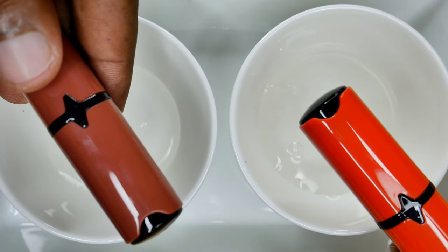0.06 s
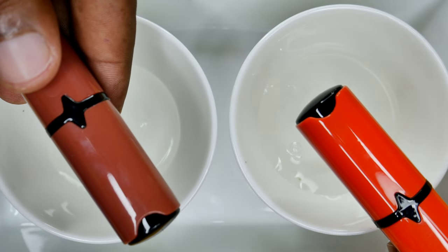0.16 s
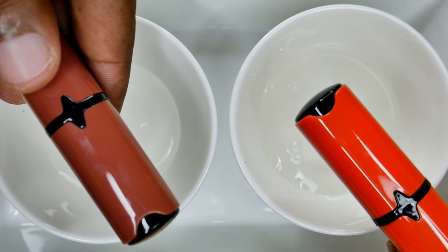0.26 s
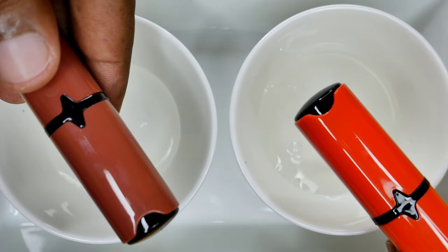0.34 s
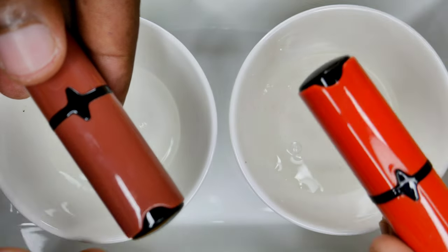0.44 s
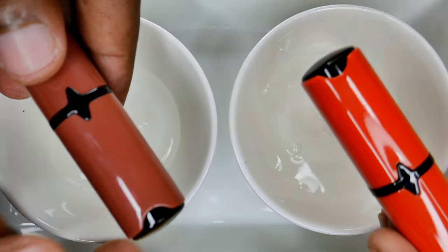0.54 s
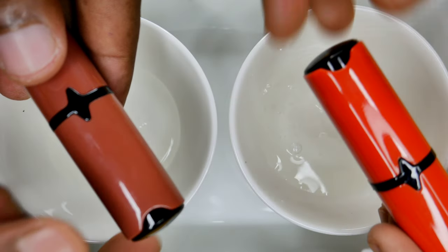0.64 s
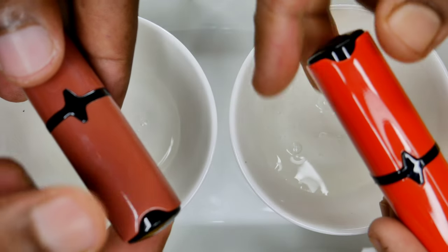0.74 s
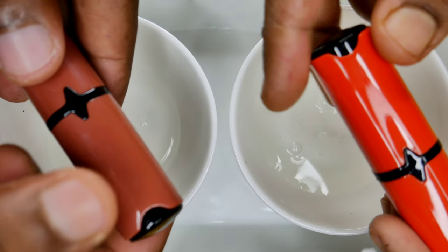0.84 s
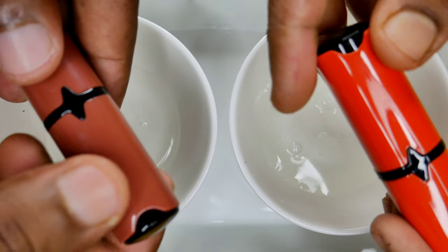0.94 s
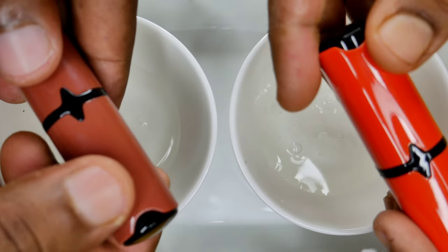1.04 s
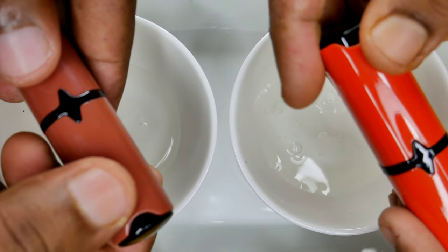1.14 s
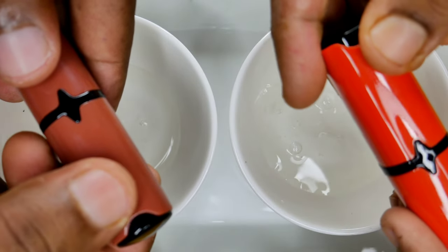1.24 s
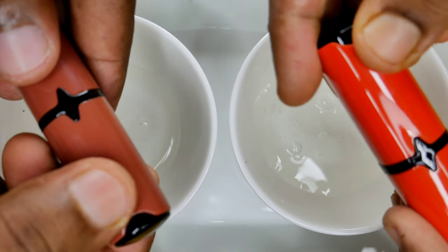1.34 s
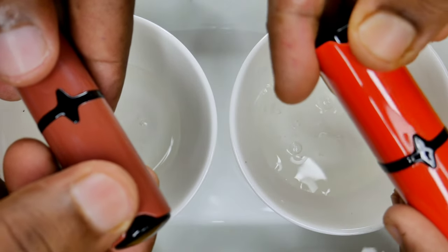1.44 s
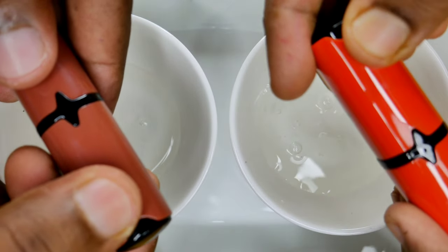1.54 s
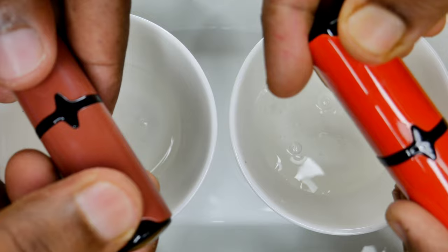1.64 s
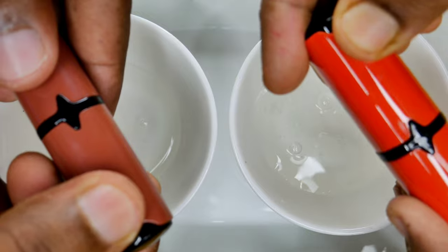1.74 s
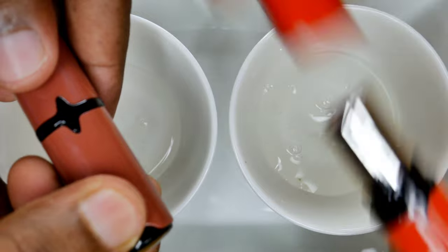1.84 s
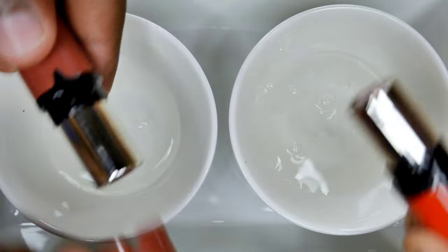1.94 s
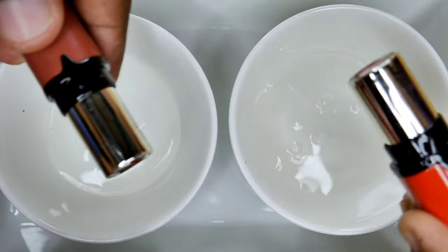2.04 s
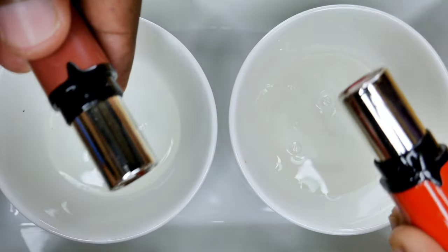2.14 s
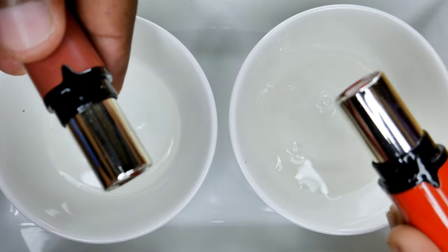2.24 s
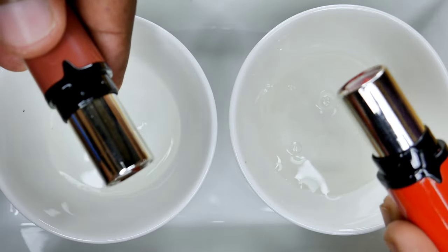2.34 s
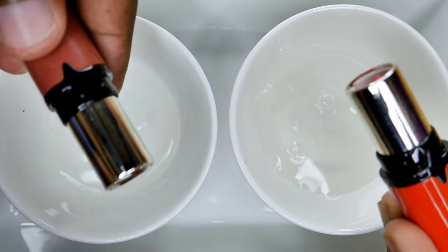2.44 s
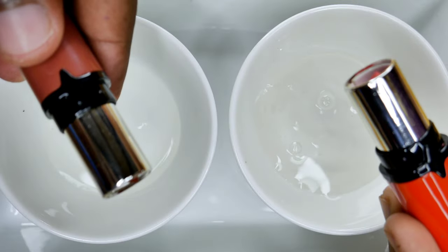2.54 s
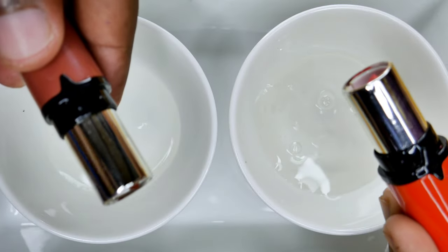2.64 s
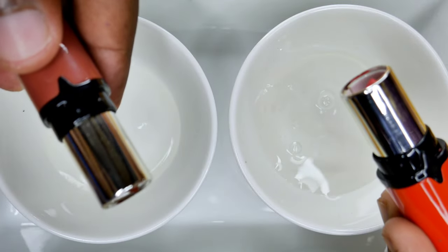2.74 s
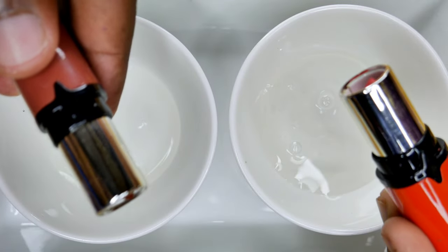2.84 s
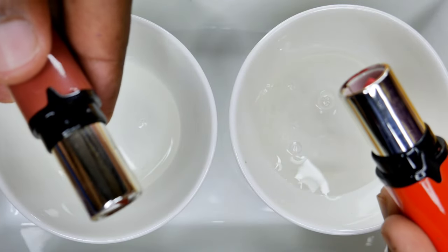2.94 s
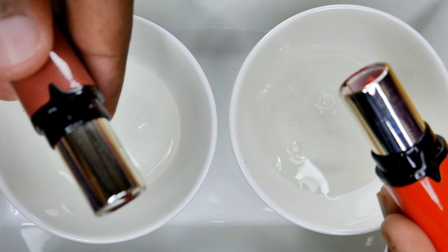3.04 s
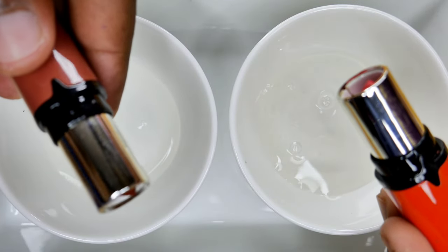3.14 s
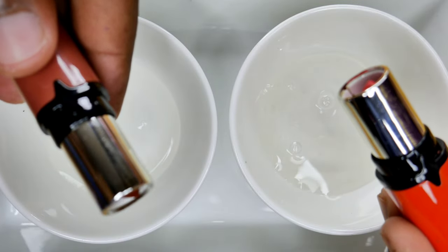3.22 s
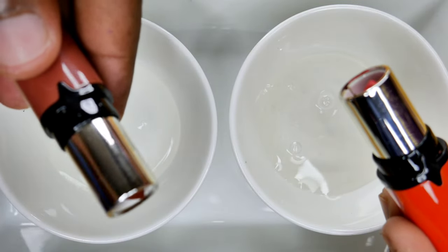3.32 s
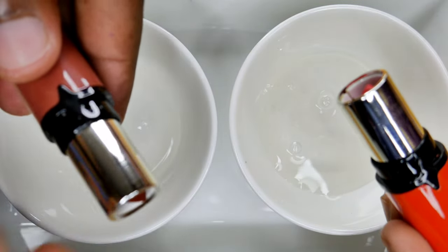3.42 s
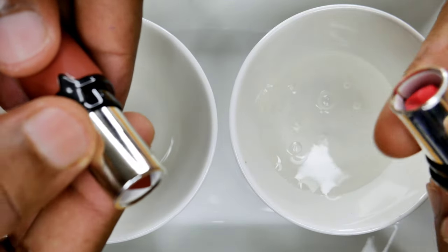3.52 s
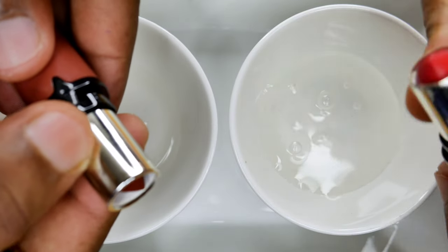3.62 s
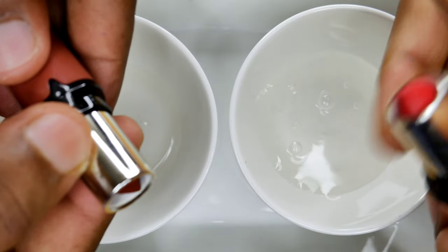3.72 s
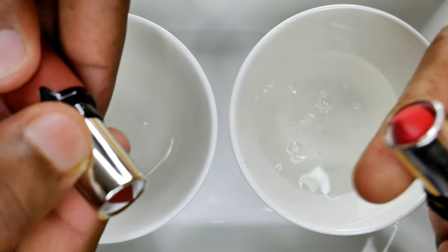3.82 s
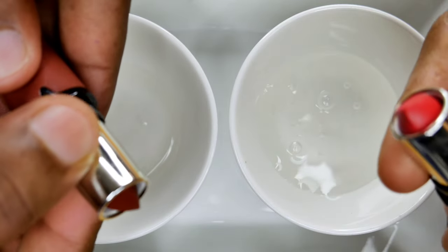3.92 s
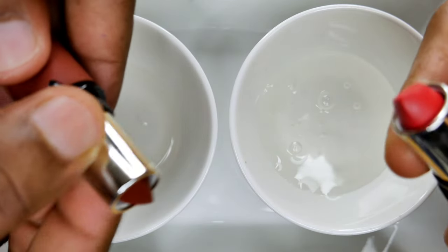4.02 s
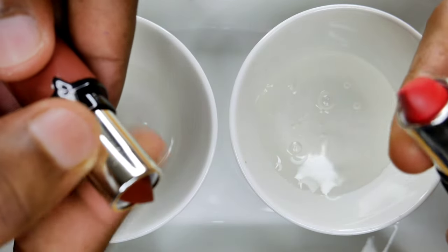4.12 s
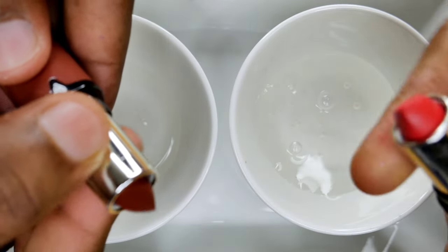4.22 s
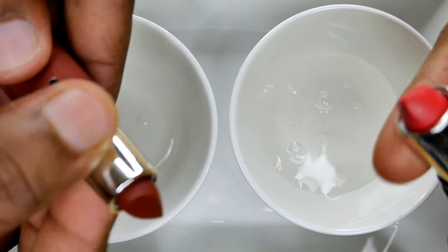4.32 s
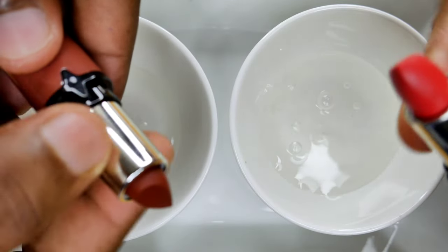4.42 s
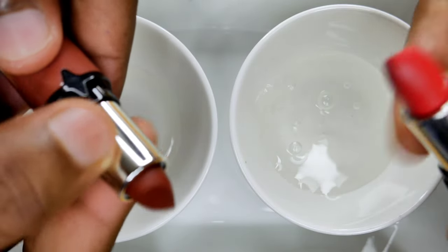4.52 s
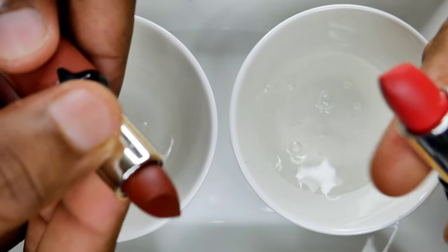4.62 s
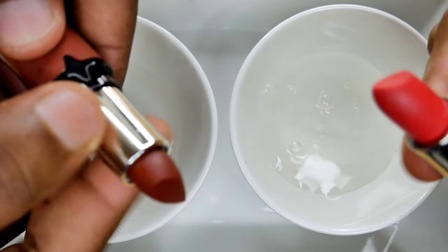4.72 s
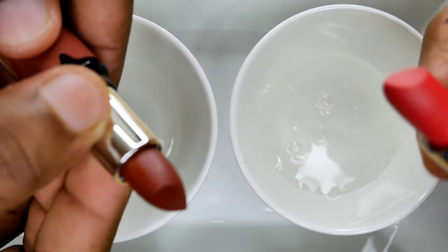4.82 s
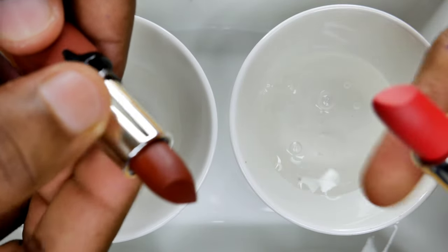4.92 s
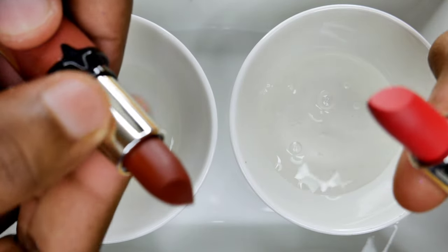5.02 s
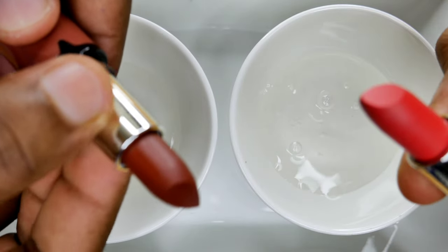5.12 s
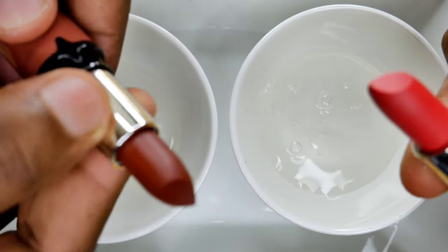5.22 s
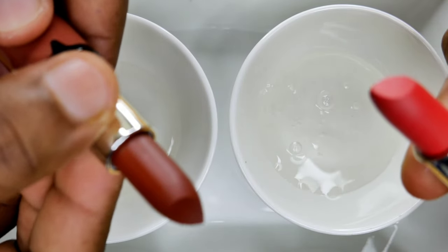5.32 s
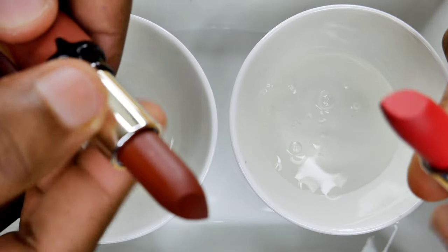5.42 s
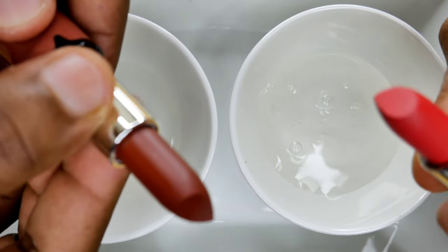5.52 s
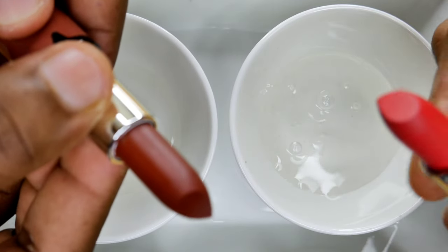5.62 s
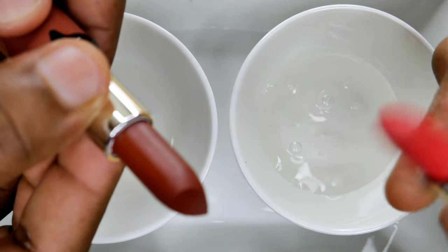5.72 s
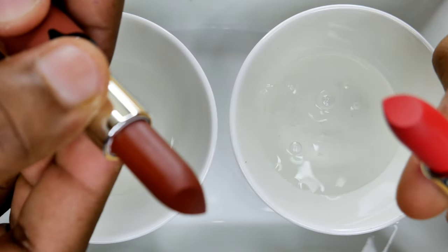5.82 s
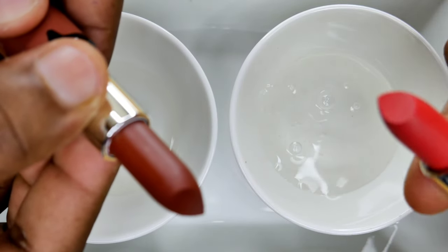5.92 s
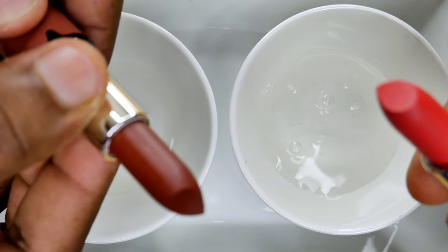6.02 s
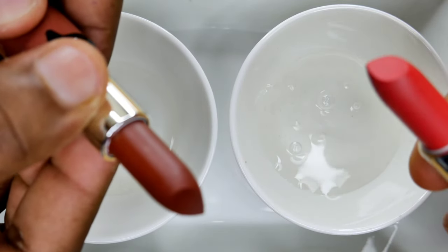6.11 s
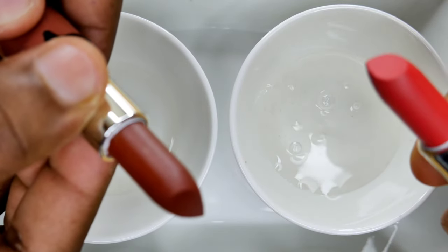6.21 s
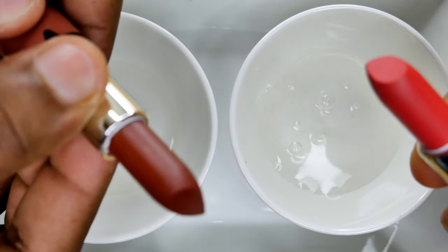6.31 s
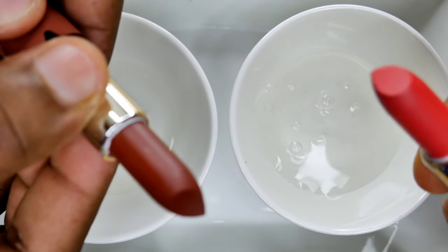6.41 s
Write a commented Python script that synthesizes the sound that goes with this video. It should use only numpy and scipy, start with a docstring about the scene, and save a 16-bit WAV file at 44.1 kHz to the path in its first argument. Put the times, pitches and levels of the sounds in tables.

```python
"""A low machine hum and a thin whine fill the room, then hands and sleeves rustle close to a microphone pair.
There two plastic lipstick cases are uncapped, their caps put down, and the sticks twisted out.
Hum, air and rustle are shaped noise, the whine a wavering sine. Snaps and ratchet ticks are noisy impacts
ringing thin shells; air chirps in a cap, knocks and a cap tap are dying tones, and cracks are noise bursts."""
import sys
import numpy as np
from scipy import signal
from scipy.io import wavfile
from scipy.ndimage import uniform_filter1d

SR = 44100
rng = np.random.default_rng(int(sys.argv[2]) if len(sys.argv) > 2 else 0)


def digitize_waveform(pressure):
    """Quantize a signal to 16-bit integers and store it at the path in sys.argv[1].

    Rows of a 2-D input are taken as channels; values are limited to [-1, 1].
    """
    field = np.atleast_2d(pressure).T
    bounded = np.clip(field, -1, 1)
    quanta = np.round(bounded * 32767).astype(np.int16)
    wavfile.write(sys.argv[1], SR, quanta)


N = 285036  # samples
HOP = 256  # samples between noise frames
FRAMES = N // HOP + 5


def gain_of(db):
    """Decibels to gain."""
    return 10 ** (np.asarray(db) / 20)


def evened(x):
    """Scales to rms 1."""
    return x / np.sqrt(np.mean(x ** 2) + 1e-20)


def peaked(x):
    """Scales to peak 1."""
    return x / np.max(abs(x))


def read(points, hz):
    """Reads a spectrum table on a log-frequency axis."""
    f, value = np.transpose(points)
    return np.interp(np.log(hz + 1), np.log(f + 1), value)


def add(mix, start_s, sound):
    """Mixes a sound in at a time."""
    part = mix[round(start_s * SR):][:len(sound)]
    part += sound[:len(part)]


def placed(events, make_sound):
    """Lays out one sound per row: its start, then the settings of its maker."""
    layer = np.zeros(N)
    for start_s, *settings in events:
        add(layer, start_s, make_sound(*settings))
    return layer


def resonate(x, hz, width_hz):
    """One damped resonance, of gain about 1 at its pitch."""
    pole = np.exp((2j * np.pi * hz - np.pi * width_hz) / SR)
    return 2 * signal.lfilter([1 - abs(pole)], [1, -pole], x).real


def band(x, lo_hz, hi_hz):
    """Gentle band-pass."""
    return signal.sosfilt(signal.butter(2, [lo_hz, hi_hz], "bandpass", fs=SR, output="sos"), x)


def paired(left, other, likeness):
    """Blends two independent spectra so the microphones share the given likeness in each band."""
    same = np.clip(likeness, -1, 1)[:, None]
    return np.array([left, same * left + np.sqrt(1 - same ** 2) * other])


def noise(level_db, likeness):
    """Two-microphone noise from levels over frequency (513 bins) and frames."""
    a, b, c, d = rng.standard_normal((FRAMES, 513, 4)).T
    spectra = paired(a + 1j * b, c + 1j * d, likeness)
    return signal.istft(spectra * gain_of(level_db), nperseg=1024, noverlap=768)[1][:, :N]


# colour of the room air before scaling: pitch_hz, level_db (per Hz)
AIR_COLOUR = [(20, -19), (74, -11), (107, -8.5), (210, -14), (364, -20.5), (568, -27), (800, -29),
              (1780, -37), (2860, -38.5), (4870, -38), (10300, -38.5), (15300, -42), (15750, -39),
              (15950, -92)]
# likeness of far sound at the two microphones: pitch_hz, likeness (1 = identical)
FAR_LIKENESS = [(60, 1), (200, 0.99), (700, 0.95), (1300, 0.86), (2400, 0.72), (3000, 0.75), (4400, 0.51),
                (8100, 0.64), (15000, 0.21)]
# fuzzy machine bands: pitch_hz, width_hz (of each of two filter passes), level_db (before the swell)
HUM_BANDS = [(61.24, 11.3, -54.5), (106.8, 40, -50.5), (189.3, 16.3, -58.5), (694, 136, -66),
             (2502, 300, -66.5)]
# the hum swells and sinks, in full only in the deepest bass: time_s, change_db
HUM_SWELL = [(0, 0), (1, 0.5), (2, 2.5), (2.95, 0.5), (3.2, 3), (3.65, 2), (3.85, -3), (4.6, 0.5),
             (5.1, -1), (5.6, 2), (6.46, 3.5)]
AIR_DB = -48.5
WHINE_HZ, WHINE_DB, WAVER_DB = 10161, -70.5, 0.7  # rms levels


def room_tone():
    """Broad rumble and hiss, fuzzy machine bands and one thin wavering whine."""
    hz, t = np.fft.rfftfreq(1024, 1 / SR), np.arange(N) / SR
    frame_s = np.arange(FRAMES) * HOP / SR
    # the swell weakens towards the treble
    air_swell_db = np.interp(frame_s, *np.transpose(HUM_SWELL)) / (1 + (hz[:, None] / 110.0) ** 2)
    air = evened(noise(read(AIR_COLOUR, hz)[:, None] + air_swell_db, read(FAR_LIKENESS, hz)))
    swell_db = np.interp(t, *np.transpose(HUM_SWELL))
    hum = np.zeros(N)
    for f, width_hz, level_db in HUM_BANDS:
        once = resonate(rng.standard_normal(N), f, width_hz)
        fuzzy = evened(resonate(once, f, width_hz))
        hum += gain_of(level_db + swell_db / (1 + (f / 240.0) ** 2)) * fuzzy
    waver_db = WAVER_DB * evened(uniform_filter1d(rng.standard_normal(N), 3000))
    whine = np.sqrt(2) * gain_of(WHINE_DB + waver_db) * np.sin(2 * np.pi * WHINE_HZ * t)
    return gain_of(AIR_DB) * air + hum + whine


# free strokes of skin and cloth: loudest_s, rise_s, fall_s, level_db, tilt_db_per_octave (held within +-3)
RUBS = [(.465, 0.021, 0.36, -51.5, 2), (.58, 0.14, 0.26, -52, 1), (1.95, .048, 0.17, -54, -1),
        (2.3, 0.21, 0.57, -57, 2), (2.58, 0.15, 0.096, -47, 5), (2.85, 0.24, 0.22, -57.5, 0),
        (3.06, 0.055, 0.1, -54.5, 3), (3.39, 0.16, 0.14, -50, 3), (3.53, 0.011, 0.043, -45, 3),
        (3.645, 0.037, 0.028, -49, 1.5), (4.559, 0.052, .029, -51, -2), (4.76, .04, 0.068, -52.5, 2.5),
        (4.96, .02, .03, -55.5, 3)]
# the fingers slide around each tick, this far below its scrape
DRAG_DB, DRAG_RISE_S, DRAG_FALL_S, DRAG_TILT = -20, 0.019, 0.11, 0.29  # tilt in dB per octave


def strokes():
    """The free strokes, and a short slide that builds up to each tick and trails after it."""
    drags = []
    for start_s, level_db, *_, scrape_db, aside in TICKS:
        drag_db = level_db + scrape_db + DRAG_DB
        drags.append((start_s + 0.0079, DRAG_RISE_S, DRAG_FALL_S, drag_db, DRAG_TILT))
    return RUBS + drags


# colour of the rustle before tilting: pitch_hz, level_db (per Hz)
RUSTLE_COLOUR = [(500, -26), (1200, -6.5), (2200, -1.5), (3000, -3), (4000, -4), (8300, -5.5), (11000, -14),
                 (15500, -14.5), (16000, -42)]
# likeness of the nearby hands at the two microphones: pitch_hz, likeness (1 = identical)
NEAR_LIKENESS = [(200, 0.62), (2400, 0.97), (4400, 0.91), (8100, 0.91), (15000, 0.84)]


def rustle():
    """Patchy friction hiss, a dull and a bright part mixed by each stroke's tilt."""
    hz, t = np.fft.rfftfreq(1024, 1 / SR), np.arange(N) / SR
    octaves = np.log2((hz[:, None] + 1) / 5000)
    grain = uniform_filter1d(rng.standard_normal((FRAMES, 513)).T, 16, 0)
    patches = evened(uniform_filter1d(grain, 5, 1))
    colour_db = read(RUSTLE_COLOUR, hz)[:, None] + 1.5 * patches  # uneven grip
    likeness = read(NEAR_LIKENESS, hz)
    dull = evened(noise(colour_db - 3 * octaves, likeness))
    bright = evened(noise(colour_db + 3 * octaves, likeness))
    dull_power, bright_power = np.zeros((2, N))
    for loudest_s, rise_s, fall_s, level_db, tilt in strokes():
        rising, falling = 1 + (t - loudest_s) / rise_s, 1 - (t - loudest_s) / fall_s
        power = np.clip(np.minimum(rising, falling), 0, 1) ** 2 * gain_of(2 * level_db)
        bright_share = np.clip(.5 + tilt / 6, 0, 1)
        dull_power += (1 - bright_share) * power
        bright_power += bright_share * power
    return dull * np.sqrt(dull_power) + bright * np.sqrt(bright_power)


# thin-shell modes of the case: pitch_hz, width_hz, level_db (before the favouring of a tick's main tone)
SHELL = [(1050, 290, -6.5), (2180, 183, 3), (2600, 420, -4.5), (3310, 170, 0), (3600, 370, -3.5),
         (4100, 170, 4), (4420, 470, -2), (5900, 600, 3), (6890, 1050, -5), (8070, 340, 1), (8760, 430, -2)]
SHELL_FALL_DB = 0.5  # per octave away from the main tone
TONE_SHARPNESS = 6  # pitch over width of the main tone
FIRST_IMPACT_DB = 10.5  # the release of the catch, above the flurry that follows
SCRAPE_UNEVEN_DB, THUMP_DB = 3.5, -1.5  # thump relative to the body
TICK_LEAD = 400  # samples of strain before the impact


def tick(level_db, slip_ms, tone_hz, body_db, edge_db, scrape_db):
    """A catch strains, lets go in one impact and a flurry that ring the shell, then scrapes on."""
    t = np.arange(-TICK_LEAD, 3000) / SR
    after = np.maximum(t, 0)
    grit, scrape_noise = rng.standard_normal((2, len(t)))
    strain = np.exp(1000 * np.minimum(t, 0) / (0.4 * slip_ms))
    force = np.where(t < 0, strain, np.exp(-1000 * after / slip_ms))
    slip = (grit + gain_of(FIRST_IMPACT_DB) * (t == 0)) * force
    # the reversed noise steers the unevenness of the scrape
    uneven_db = SCRAPE_UNEVEN_DB * evened(uniform_filter1d(scrape_noise[::-1], size=30))
    scrape_shape = (1 - np.exp(-after / 0.00032)) * np.exp(-after / 0.016)
    scrape = gain_of(scrape_db + uneven_db) * uniform_filter1d(scrape_noise, size=3) * scrape_shape
    drive = slip + scrape
    shell = np.zeros(len(t))
    for k, (f, width_hz, mode_db) in enumerate(SHELL):
        favoured_db = mode_db - SHELL_FALL_DB * abs(np.log2(f / tone_hz))
        shell += (-1) ** k * gain_of(favoured_db) * resonate(drive, f, width_hz)
    main_tone = resonate(slip, tone_hz, tone_hz / TONE_SHARPNESS)
    middle = 0.4 * peaked(band(drive, 1900, 8700)) + peaked(shell) + 0.62 * peaked(main_tone)
    body = gain_of(body_db) * peaked(band(drive, 810, 2600))
    edge = gain_of(edge_db) * peaked(band(drive, 7800, 13200))
    thump = gain_of(body_db + THUMP_DB) * peaked(band(drive, 95, 1090))
    return gain_of(level_db) * (peaked(middle) + body + edge + thump)


def port_difference(x, turned_db):
    """In the treble the microphones hear different faces of the shell: phases part, levels stay alike."""
    half = rng.standard_normal(60) * np.exp(-np.arange(60) / 15)
    odd = np.r_[-half[::-1], 0, half]  # odd symmetry keeps the levels alike
    smear = np.convolve(odd, signal.firwin(121, 4400, pass_zero=False, fs=SR))
    return gain_of(turned_db) * np.convolve(x, smear / np.linalg.norm(smear), "same")


# snaps and ticks of the cases: start_s (impact 0.6 ms later), level_db (of the middle part), slip_ms,
# tone_hz (main shell tone), body_db, edge_db (both below or above the middle),
# scrape_db (against the slip), aside (0 = ahead of the microphones, 1 = off to a side)
TICKS = [(1.254, -41, 1.2, 1560, 0, -22, -15, 0), (1.4387, -39.5, 1.6, 1230, -1, -27, -11, 0.087),
         (1.7879, -15.5, 1.6, 8500, -25, -6, -20, 0.8), (1.7903, -5.5, 2.16, 3270, -10, -15.5, -16, 0.87),
         (1.8195, -27, 2, 7850, -4, -14, -18, 0), (1.8239, -27.5, 1.7, 3600, -1, -5, -16, 0),
         (1.8784, -13, 2.7, 3650, -3, -14, -14.5, 0.085), (1.91, -32, 2.1, 1100, 6, -12, -17, 0),
         (1.9235, -25, 2.5, 3880, -4, -2, -4.5, 0), (1.936, -20, 4.3, 3870, -6, -9, -15.5, 0.81),
         (3.223, -47.5, 2.2, 8950, -10, 9, -2, 0), (3.538, -18.5, 2, 1960, -6, -18, -21, 0.65),
         (3.7545, -23, 4.3, 7750, -12.5, -11.5, -18, 0.88), (3.9386, -29, 2.5, 3370, -11, -4, -10, 1),
         (4.0261, -32.5, 1.3, 3200, -17, -18, -10.5, 0), (4.2014, -42, 1.4, 4200, -4, -12, -2, 0),
         (4.219, -39, 5.1, 5230, -5.5, 1, -2, 0.82), (4.3612, -19.5, 0.64, 6100, -27, -14, -23, 0.085),
         (4.3629, -24.5, 1.8, 8800, -8, -9, -8, 0), (4.6924, -43.5, 2.2, 1050, -5, -24, -5, 0),
         (4.7646, -29, 2.8, 3130, -22, -8, -14, 1), (4.809, -37, 2.6, 4130, -6, -20, -3.5, 0),
         (5.04, -27, 1.8, 4180, -4.5, -27, -11.5, 1), (5.056, -29.5, 2.5, 4100, -13, -23, -9.5, 0),
         (5.139, -37, 1.8, 2010, -17, -18, -20, 0), (5.1638, -29.5, 1.5, 5900, -10, -23, -30, 0.73),
         (5.2654, -18, 2.3, 2860, -13.5, -15, -14, 0.075), (5.279, -38, 1.6, 2080, -5, -18, -27, 0),
         (5.3605, -37.5, 2.4, 6660, -13, -27, -24, 0), (5.4432, -17, 1.56, 7100, -16.5, -15, -30, 1),
         (5.5228, -21, 1.3, 2830, -15.5, -30, -17.5, 0), (5.736, -19.5, 0.94, 4010, -15, -16, -25, 0),
         (5.889, -37, 1.6, 7300, -16, -11, -26, 0), (5.9106, -26, 2.2, 6700, -21, -23, -24, 1),
         (5.9654, -31, 3.1, 6000, -3, -10, -16, 1), (5.972, -15.5, 2.96, 4060, -8, -10, -18.5, 0.93),
         (6.0118, -30.5, 2.9, 7040, -20, 7, -32, 0.16), (6.0831, -20, 1, 1220, -37, -10, -18.5, 0),
         (6.1026, -33.5, 1.5, 3020, -7, -14, -18, 0), (6.1993, -30, 4.1, 1200, -7, -20, -18, 0),
         (6.2188, -29.5, 1.5, 4700, -10, -11, -37, 0), (6.3714, -35, 4.4, 7400, -15, -12, -24, 0.87)]
AHEAD_DB, ASIDE_DB = -21.5, -5  # treble difference between the microphones


def snaps_and_ticks():
    """Every catch of the cases; its treble part of opposite sign at the two microphones widens it."""
    shared, apart = np.zeros((2, N))
    for start_s, *settings, aside in TICKS:
        sound = tick(*settings)
        lead_s = start_s + .0006 - TICK_LEAD / SR
        add(shared, lead_s, sound)
        add(apart, lead_s, port_difference(sound, AHEAD_DB + aside * (ASIDE_DB - AHEAD_DB)))
    return shared, apart


POP_T60_PER_RISE = 4.9
RING_ON_T60, RING_ON_ROUGH = 0.29, 0.33  # seconds; roughness 0-1
POP_SAG = 0.057  # share of the pitch lost


def pop(peak_db, start_hz, rise_ms, rough, ring_on_db):
    """An air column swells and dies fast, then rings on faintly, sagging and shaken by friction."""
    t = np.arange(8000) / SR
    hz = start_hz * (1 - POP_SAG * (1 - np.exp(-t / 0.043)))
    shake = uniform_filter1d(rng.standard_normal((len(t), 2)), 35, 0)
    a, b = evened(uniform_filter1d(shake, size=20, axis=0)).T
    burst = (rough, 0, POP_T60_PER_RISE * rise_ms / 1000)
    ring_on = (RING_ON_ROUGH, ring_on_db, RING_ON_T60)
    swing = 0
    for share, part_db, t60_s in (burst, ring_on):
        share = np.clip(share, 0, 1)
        swing = swing + ((1 - share) + share * (a + 1j * b)) * gain_of(part_db - 60 * t / t60_s)
    turn = np.exp(2j * np.pi * np.cumsum(hz) / SR)
    swell = 1 - np.exp(-(1000 * t / rise_ms) ** 2)
    return gain_of(peak_db) * peaked((swing * turn).imag * swell)


# hollow chirps of air in a cap: start_s, peak_db, pitch_hz (at the start), rise_ms, roughness (0-1),
# ring_on_db (rough ringing on, against the burst)
POPS = [(1.532, -50, 1950, 4.9, 0.3, -25), (2.954, -34.5, 1702, 2.2, 0.1, -15),
        (3.046, -37.5, 1420, 2.9, 0, -33), (3.062, -23.5, 1330, 2.5, 0.07, -37),
        (3.2885, -36, 1350, 3.5, 0, -35), (3.2917, -37.5, 1063, 3.5, 0.1, -31),
        (3.314, -40.5, 1315, 4, 0.2, -32)]


def air_chirps():
    """Air in a cap sounds as short hollow tones."""
    return placed(POPS, pop)


def ring(peak_db, modes):
    """A short soft blow on a set of dying modes, neighbours swinging opposite ways."""
    t = np.arange(8000) / SR
    sound = np.zeros(len(t))
    for k, (f, mode_db, t60_s) in enumerate(modes):
        sound += (-1) ** k * gain_of(mode_db - 60 * t / t60_s) * np.sin(2 * np.pi * f * t)
    return gain_of(peak_db) * peaked(sound * (1 - np.exp(-t / 0.001)))


# low modes of a case in the hand: pitch_hz, level_db (before favouring), t60_s
HELD_CASE = [(146, 5, 0.029), (333, 4.5, 0.022), (594, 11, 0.011), (1015, -25, 0.023)]
KNOCK_FALL_DB = 2.5  # per octave away from the best-struck pitch


def knock(peak_db, struck_hz):
    """A blow on the held case; where it lands favours the modes near one pitch."""
    modes = []
    for f, mode_db, t60_s in HELD_CASE:
        modes.append((f, mode_db - KNOCK_FALL_DB * abs(np.log2(f / struck_hz)), t60_s))
    return ring(peak_db, modes)


# dull knocks of a case against fingers or its base: start_s, peak_db, pitch_hz (best struck)
KNOCKS = [(1.789, -29, 150), (1.8769, -19, 260), (3.5377, -36, 330), (4.3633, -33.5, 500),
          (4.3708, -33, 250), (5.9704, -16.5, 360), (6.0832, -20, 313), (6.2, -25.5, 300)]


def case_knocks():
    """Dull blows sound the low modes of the held case."""
    return placed(KNOCKS, knock)


def crack(peak_db):
    """A dull noisy crack: a burst of noise that dies within milliseconds."""
    t = np.arange(1500) / SR
    burst = rng.standard_normal(len(t)) * np.exp(-t / 0.0017)
    return gain_of(peak_db) * peaked(band(band(burst, 910, 1730), 970, 2800))


# dull cracks that start a tap or a chirp: start_s, peak_db
CRACKS = [(2.9528, -24), (4.8926, -28.5)]


def dull_cracks():
    """The noisy onsets of a tap and a chirp."""
    return placed(CRACKS, crack)


# a cap taps something hard: start_s, peak_db
TAPS = [(4.8921, -21.5)]
# modes of the cap: pitch_hz, level_db, t60_s
CAP = [(1006, 5, 0.028), (1387, 0, 0.058), (2060, -5.5, 0.19), (2480, 15.5, 0.014), (2590, -11.5, 0.15),
       (3190, -13, 0.06), (4520, -14.5, 0.049)]


def cap_taps():
    """A tap on something hard rings the modes of the cap."""
    return placed(TAPS, lambda peak_db: ring(peak_db, CAP))


# how long the room rings: pitch_hz, t60_s
ROOM_DECAY = [(300, 0.13), (1500, 0.14), (5000, 0.026), (14000, 0.15)]


def room(x):
    """Sparse echoes of random sign, each band dying at its own speed; alike at both microphones in the bass."""
    echoes = np.zeros((2, SR // 2))
    slots = np.arange(200, SR // 2 - 20, 20)
    at = slots + rng.integers(0, 20, (2, len(slots)))
    np.put_along_axis(echoes, at, rng.choice([-1., 1.], at.shape), 1)
    hz, t, spectra = signal.stft(echoes, SR, nperseg=256)
    spectra = paired(*spectra, read(FAR_LIKENESS, hz))
    fading = gain_of(-60 * t / read(ROOM_DECAY, hz)[:, None])
    tail = signal.istft(spectra * fading, SR, nperseg=256)[1]
    return signal.fftconvolve(x[None], tail / np.linalg.norm(tail[0]), axes=1)[:, :N]


def scene():
    """Everything struck goes through the room; room tone and rustle are added without it."""
    steady = room_tone() + rustle()
    struck, apart = snaps_and_ticks()
    struck = struck + air_chirps() + case_knocks() + dull_cracks() + cap_taps()
    return struck + np.array([apart, -apart]) + gain_of(-15.0) * room(struck) + steady


EDGE_HZ = 16600  # top of the microphone pair's band


def record(dry):
    """The left microphone is a shade louder; then the band limit."""
    balanced = dry * gain_of([[.15], [-.15]])
    low_pass = signal.firwin(511, EDGE_HZ, window=("kaiser", 9), fs=SR)
    return signal.oaconvolve(balanced, low_pass[None], "same")


dry = scene()
out = record(dry)
digitize_waveform(out)
```